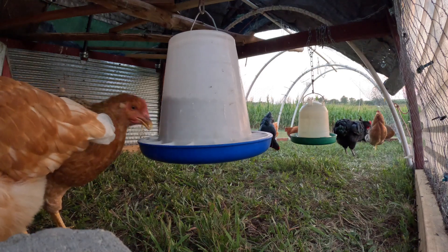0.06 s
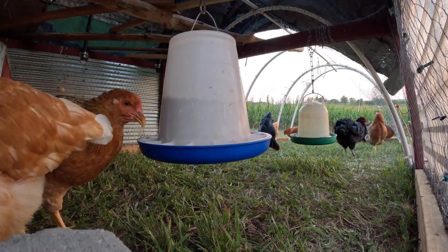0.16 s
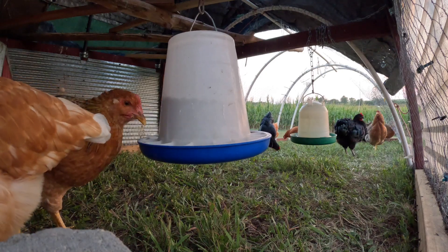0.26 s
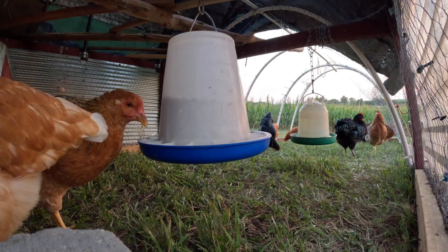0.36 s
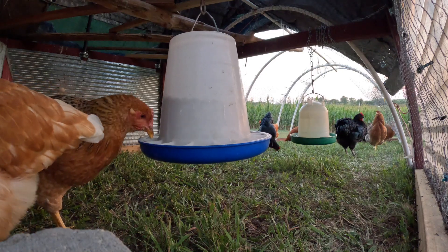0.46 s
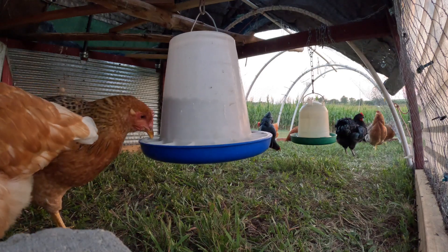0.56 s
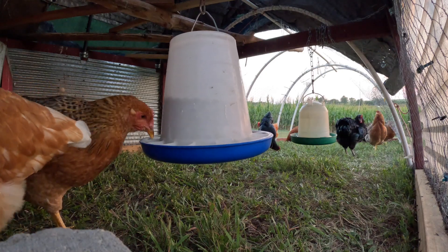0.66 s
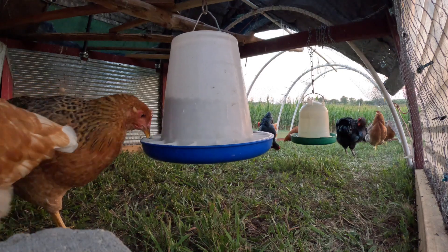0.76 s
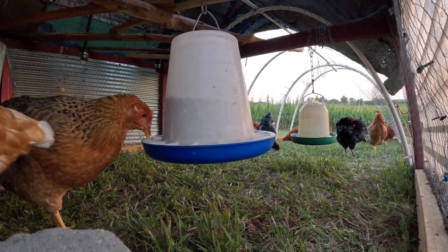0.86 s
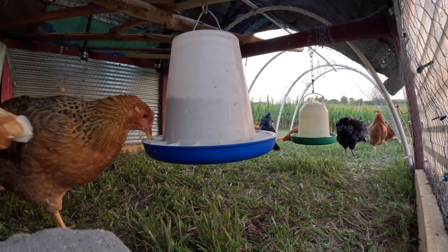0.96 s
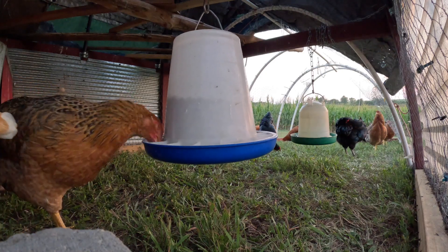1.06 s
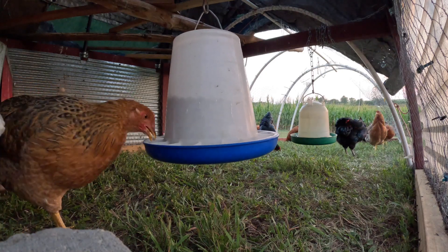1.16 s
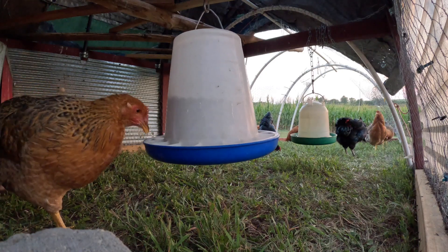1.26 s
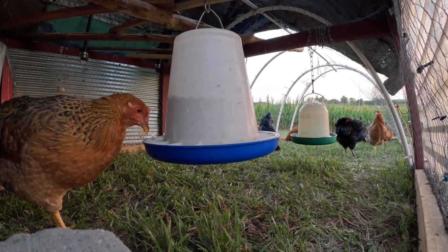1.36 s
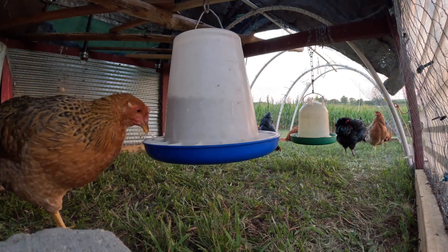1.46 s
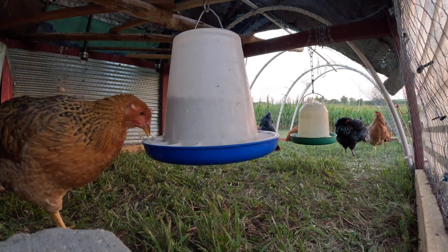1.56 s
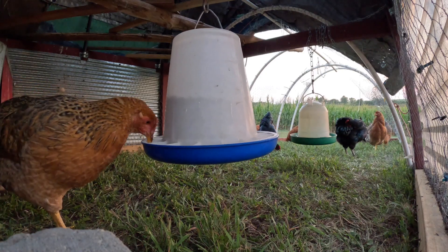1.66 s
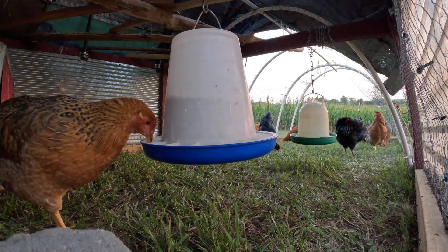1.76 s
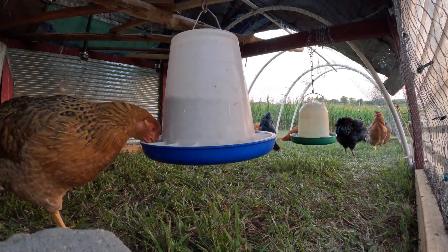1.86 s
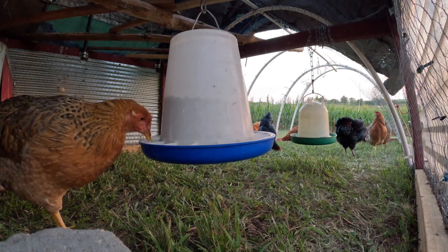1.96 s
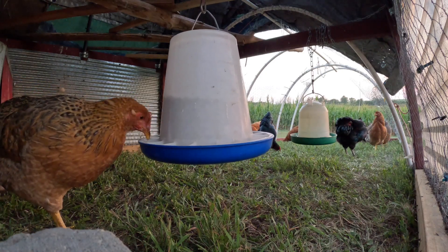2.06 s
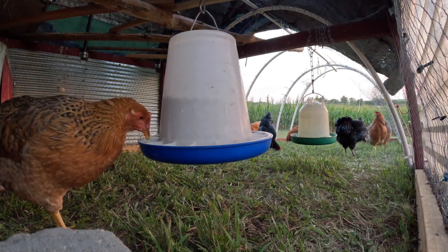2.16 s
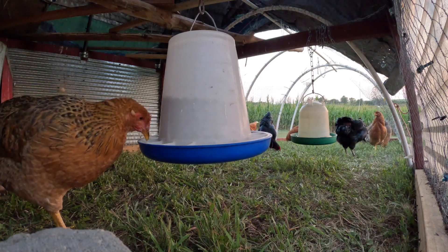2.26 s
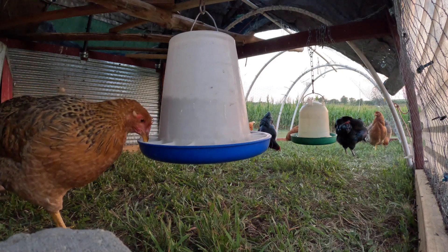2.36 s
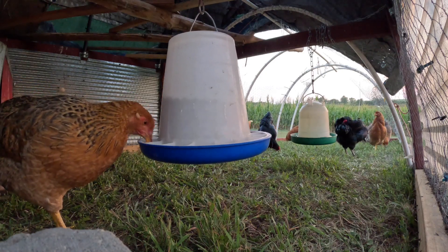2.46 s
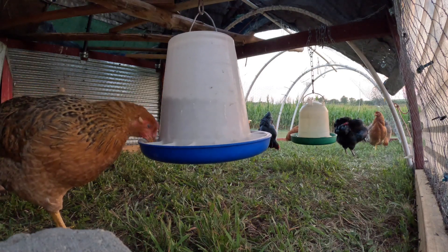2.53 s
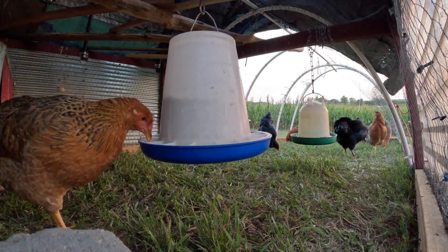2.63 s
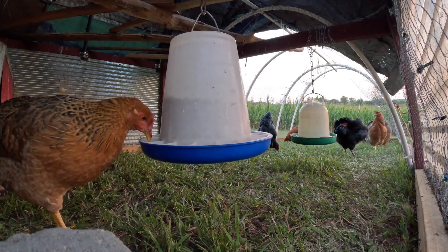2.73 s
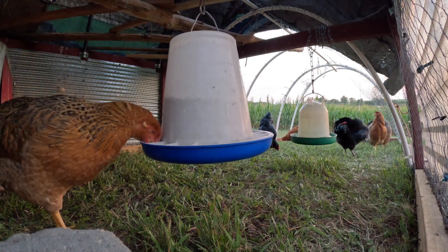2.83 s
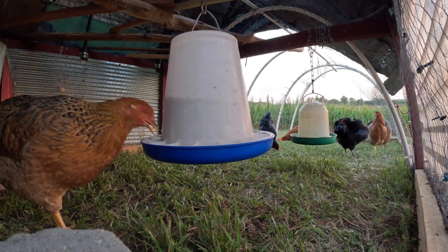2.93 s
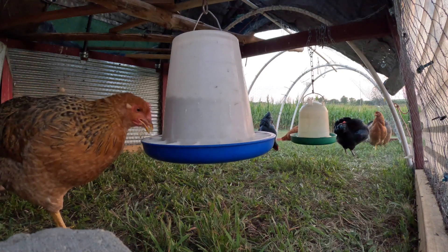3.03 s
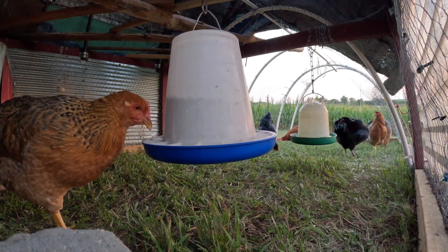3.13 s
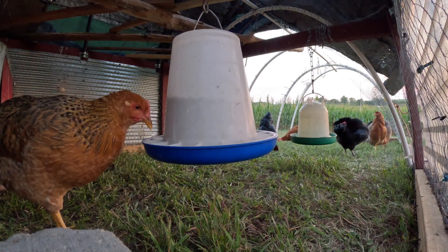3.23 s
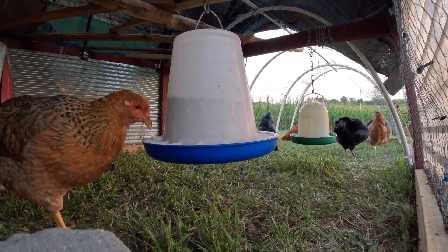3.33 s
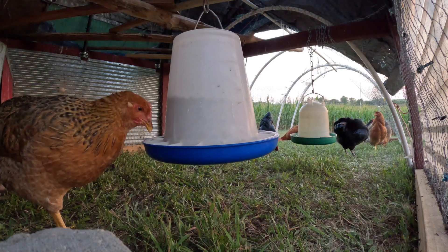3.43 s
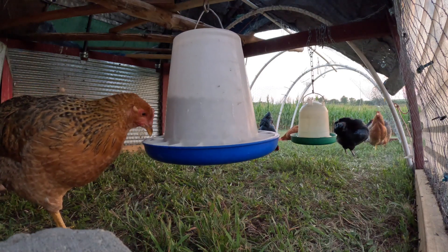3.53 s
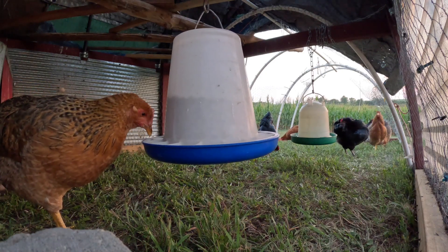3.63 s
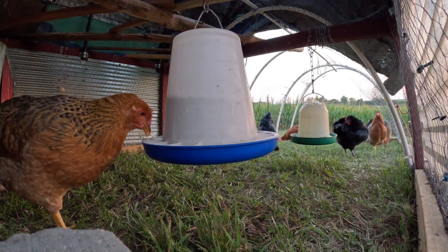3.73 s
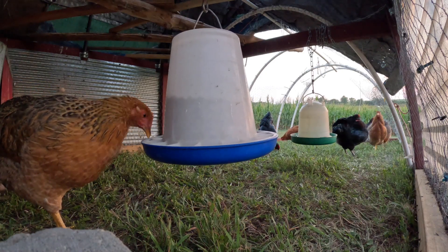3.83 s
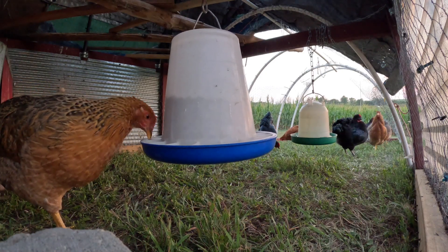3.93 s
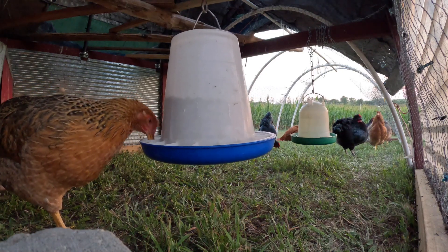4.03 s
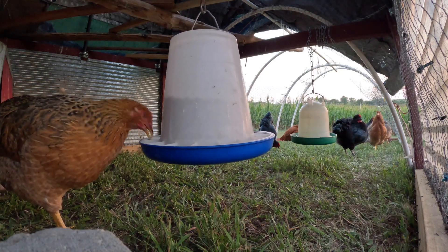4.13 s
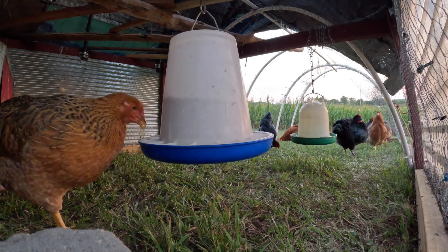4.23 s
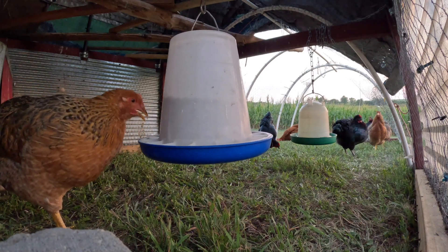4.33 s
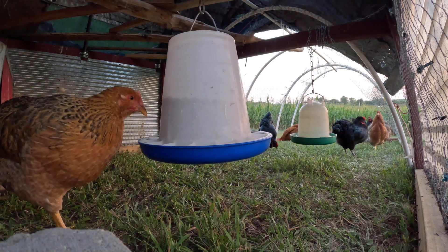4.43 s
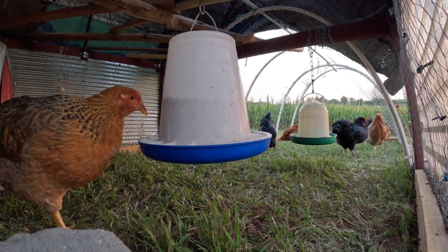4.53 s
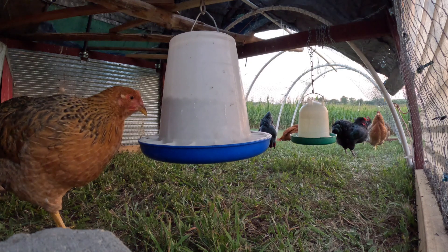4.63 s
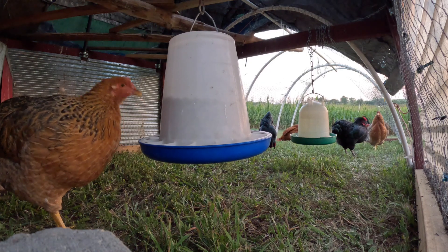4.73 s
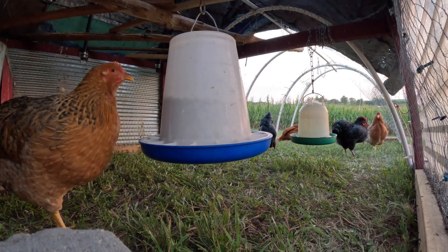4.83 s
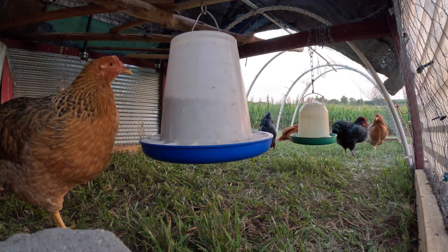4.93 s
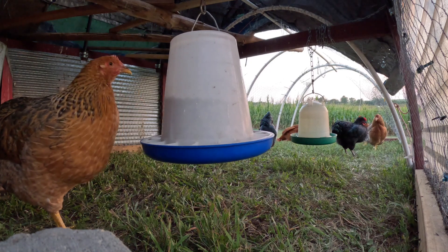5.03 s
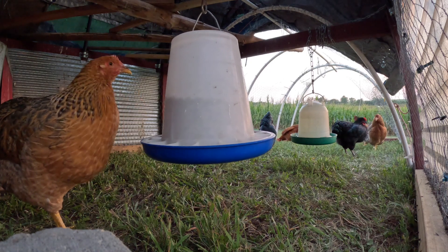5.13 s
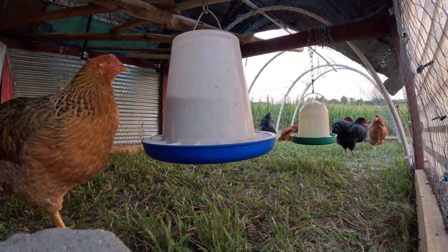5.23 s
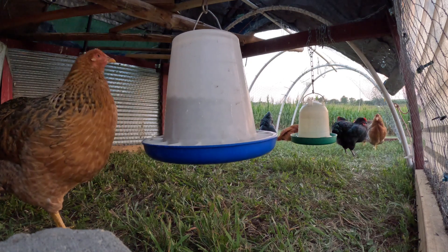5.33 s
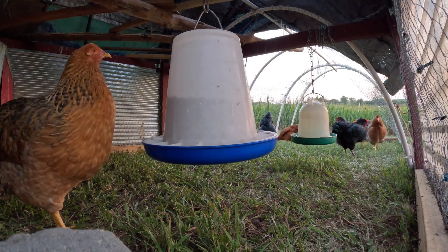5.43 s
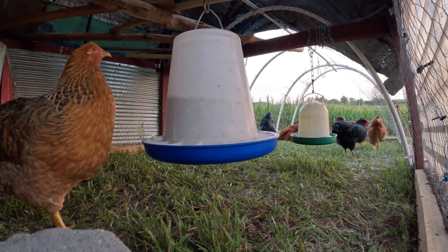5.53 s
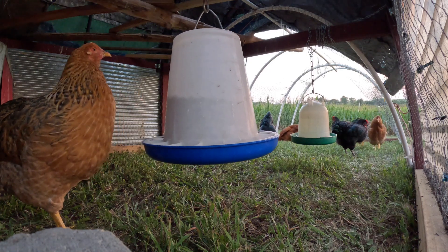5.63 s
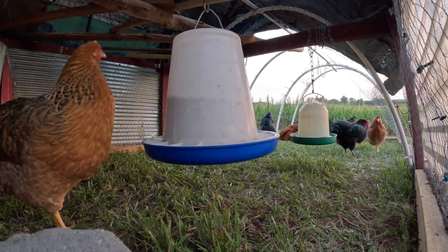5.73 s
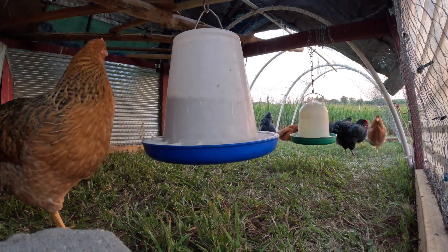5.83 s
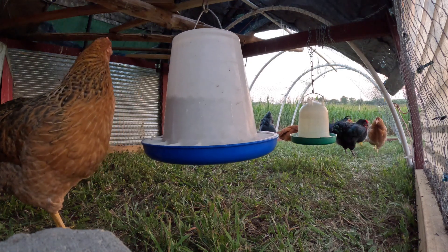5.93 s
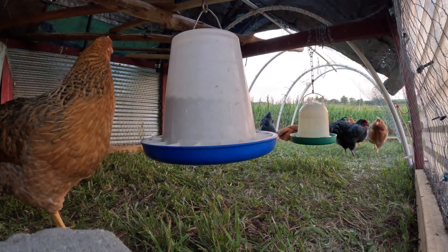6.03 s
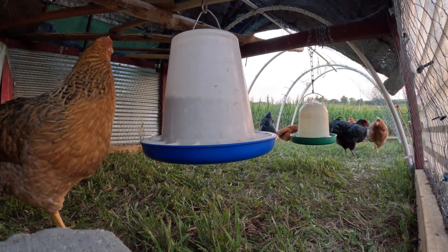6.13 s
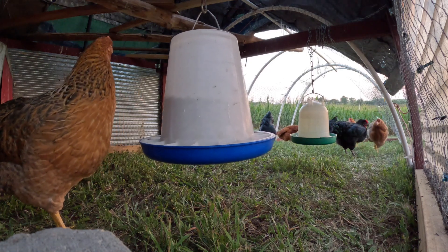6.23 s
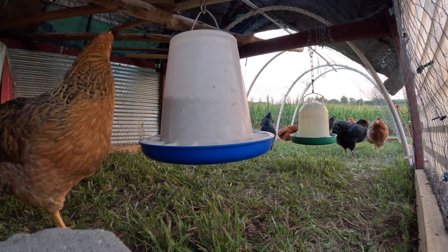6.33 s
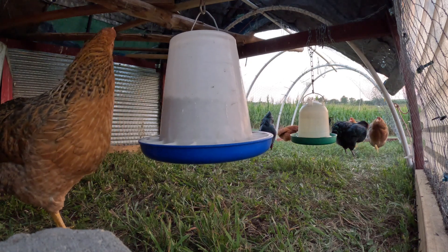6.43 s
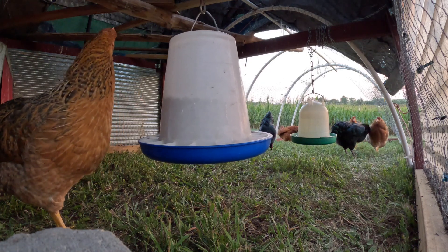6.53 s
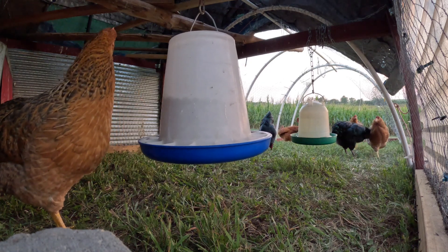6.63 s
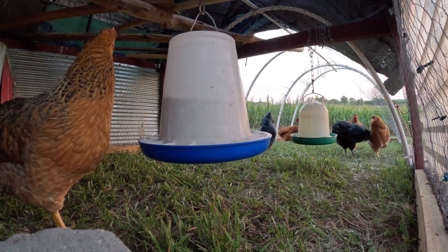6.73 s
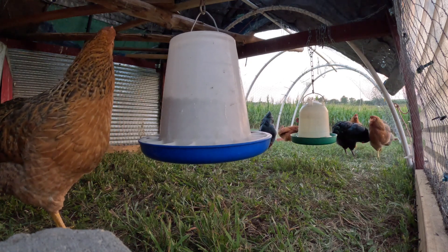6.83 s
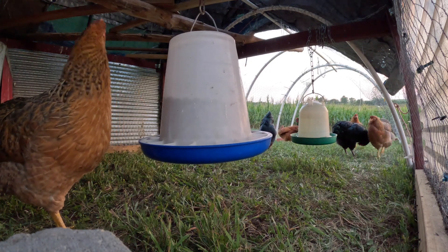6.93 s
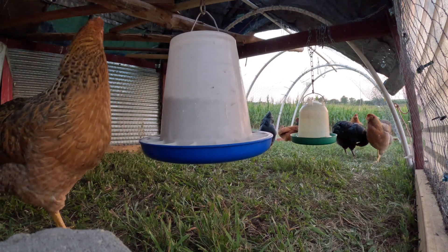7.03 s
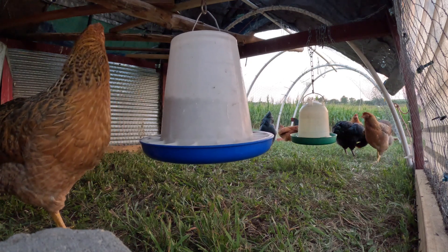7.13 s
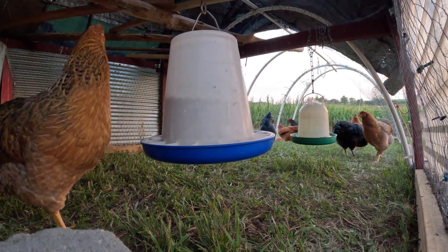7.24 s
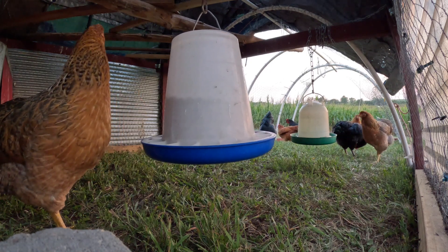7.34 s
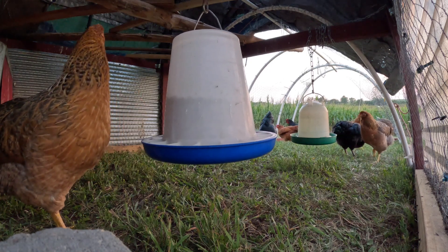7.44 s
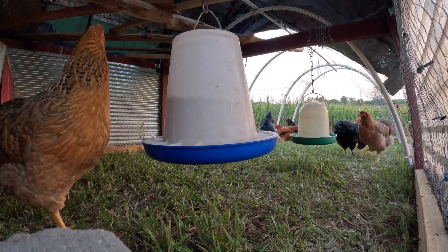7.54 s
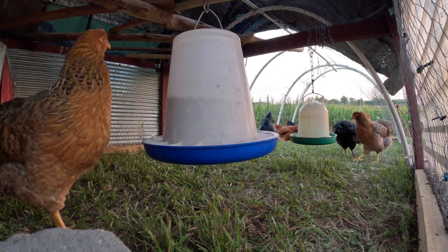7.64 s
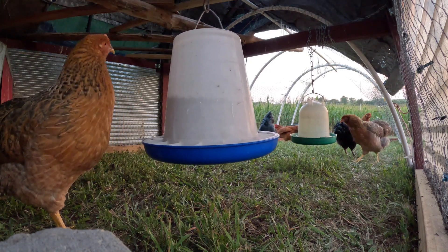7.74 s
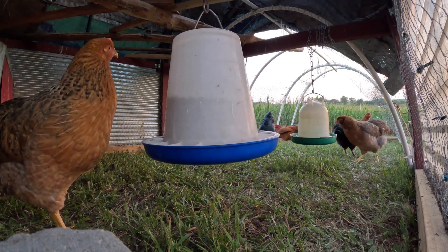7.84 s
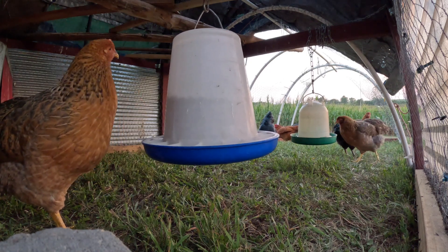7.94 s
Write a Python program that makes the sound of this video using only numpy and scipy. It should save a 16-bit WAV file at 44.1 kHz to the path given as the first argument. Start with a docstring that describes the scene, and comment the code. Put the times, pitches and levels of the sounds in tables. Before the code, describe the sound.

Faint insects chirr steadily around an outdoor chicken shelter, over light air and a distant rumble. Near the microphone, slightly left, a beak strikes a plastic feed tray in irregular bursts, some sharp and loud, most light, shifting the grain. After a lull with slight feather rustling, chickens a little further off cluck softly and end with short gliding squeaks.

```python
"""Hen at a hanging feeder

A hen pecks grain from a hanging plastic feeder under a low tin-roofed shelter. Her beak cracks
against the tray, rings it and stirs the feed; later, feathers rustle and the flock gives soft
clucks and squeaks, shaped by throat and beak. Crickets and katydids rasp their wings in the
field all round, over light air and a faint distant rumble."""
import sys
import numpy as np
from scipy import signal
from scipy.fft import rfft, irfft, next_fast_len
from scipy.io import wavfile

SR = 44100
rng = np.random.default_rng(int(sys.argv[2]) if len(sys.argv) > 2 else 0)


def wav_record(signal):
    """Record a signal, one row per channel, as 16-bit PCM in the file named by sys.argv[1]."""
    frames = np.transpose(np.atleast_2d(signal))
    bounded = np.clip(frames, -1, 1)
    # unit amplitude maps onto the largest positive 16-bit level
    quanta = np.round(bounded * 32767).astype(np.int16)
    wavfile.write(sys.argv[1], SR, quanta)


N = 352359
TIME = np.arange(N) / SR


def amp(db):
    """Decibels to gain."""
    return 10 ** (np.asarray(db) / 20)


def unit(x):
    """Scales to rms 1."""
    return x / np.sqrt(np.mean(x ** 2) + 1e-20)


def peaked(x):
    """Scales to peak 1."""
    return x / abs(x).max()


def read(points, hz):
    """Reads a curve on a log-frequency axis."""
    f, value = np.transpose(points)
    return np.interp(np.log(hz + 1), np.log(f), value)


def follow(rows, t):
    """Each column of an automation curve at the times t."""
    times, *columns = np.transpose(rows)
    return [np.interp(t, times, column) for column in columns]


def add(mix, start, sound):
    """Mixes a sound in at a start time in seconds."""
    part = mix[max(round(start * SR), 0):][:len(sound)]
    part += sound[:len(part)]


def colour(x, eq):
    """Runs a full-length signal through an EQ curve."""
    size = next_fast_len(N, real=True)
    return irfft(rfft(x, size) * amp(read(eq, np.fft.rfftfreq(size, 1 / SR))), size)[..., :N]


def pulse(eq, size=2048):
    """The minimum-phase click with a given spectrum."""
    log_gain = np.log(amp(read(eq, abs(np.fft.fftfreq(size, 1 / SR)))))
    return np.fft.ifft(np.exp(np.conj(signal.hilbert(log_gain)))).real


def drift(n, per_s):
    """A random modulator that glides to a new value per_s times a second."""
    knots = rng.standard_normal(4096)
    return np.interp(np.arange(n) / SR * per_s, np.arange(len(knots)), knots)


def ring(modes, t, tuning=1, tilt_db=0):
    """Struck modes, neighbours swinging opposite ways; tilt_db per octave favours the high ones."""
    out = np.zeros(len(t))
    for k, (hz, db, t60) in enumerate(modes):
        envelope = amp(db + tilt_db * np.log2(hz / modes[0][0]) - 60 * t / t60)
        out += (-1) ** k * envelope * np.sin(2 * np.pi * hz * tuning * t)
    return out


def spread(mid, side, width, pan_db):
    """Mid and side to stereo; positive pan_db leans left."""
    return np.array([(mid + width * side) * amp(pan_db / 2), (mid - width * side) * amp(-pan_db / 2)])


def crackle(showers, eq, per_s, spread_db):
    """Short showers of tiny clicks of uneven size."""
    out, click, n = np.zeros(N), pulse(eq), SR // 4
    for start, length, db in showers:
        hits = rng.random(n) < per_s / SR
        sizes = amp(spread_db * np.minimum(rng.exponential(1, n), 3))
        ticks = (hits * sizes * rng.choice([-1, 1], n))[:int(length * SR)]
        shower = unit(ticks * signal.windows.tukey(len(ticks), .3))
        add(out, start, amp(db) * signal.fftconvolve(shower, click / np.linalg.norm(click)))
    return out


# Side-channel EQ, setting how diffuse the beds are: (frequency [Hz], gain [dB])
BED_SIDE_EQ = [(60, -12.5), (130, -6), (290, -3), (640, -0.5), (1410, -2), (3100, 0), (6820, -11),
               (15000, -6)]

def bed(eq, db, flutter_db, flutter_per_s, pan_db):
    """A distant, partly diffuse noise bed with a fluttering level."""
    mid, side = unit(colour(rng.standard_normal((2, N)), eq))
    stereo = spread(mid, colour(side, BED_SIDE_EQ), 0.92, pan_db)
    return stereo * amp(db + flutter_db * drift(N, flutter_per_s))


# Tone of the open air: (frequency [Hz], gain [dB])
AIR_EQ = [(20, -9), (45, -8), (105, -11), (200, -14.5), (400, -14), (800, -22), (1200, -23), (2400, -28),
          (4500, -24), (7600, -20), (8300, -22), (10500, -41), (12500, -45), (15000, -51.5)]

def open_air():
    """A broad, steady hush, with light air buffeting the microphone in the sub-bass."""
    hush = bed(AIR_EQ, db=-69.5, flutter_db=.6, flutter_per_s=2.9, pan_db=-2.5)
    gust_eq = [(15, -3), (42, 16), (80, -10.5), (130, -16), (300, -50.5)]
    return hush + bed(gust_eq, db=-74.5, flutter_db=4.2, flutter_per_s=9, pan_db=-2)


# Tone of the far rumble: (frequency [Hz], gain [dB])
RUMBLE_EQ = [(90, -12.5), (125, -3.5), (155, 6), (205, 7), (260, -1), (350, -8), (600, -58)]
# Its fader ride: (time [s], level [dB])
RUMBLE_RIDE = [(0.4, -72), (2.29, -68), (3.73, -69.5), (4.9, -64.5), (5.12, -66), (7.4, -66.5)]

def distant_rumble():
    """Low, fluttering noise that slowly builds."""
    return bed(RUMBLE_EQ, follow(RUMBLE_RIDE, TIME)[0], flutter_db=2.7, flutter_per_s=22, pan_db=-0.61)


# Tone of the far rushing: (frequency [Hz], gain [dB])
RUSH_EQ = [(300, 7.5), (600, 0.5), (850, -1.5), (1080, 9.5), (1400, 7), (1900, -2.5), (2600, -20),
           (4000, -27.5)]
# Its fader ride: (time [s], level [dB])
RUSH_RIDE = [(0.3, -75.5), (0.57, -82.5), (2.05, -74.5), (2.54, -79), (5.76, -72), (6.31, -66.5),
             (6.65, -73.5), (7.9, -74)]

def distant_rush():
    """A soft midrange rushing that swells and ebbs."""
    return bed(RUSH_EQ, follow(RUSH_RIDE, TIME)[0], flutter_db=1.5, flutter_per_s=19, pan_db=-0.92)


# Tone of the massed far insects: (frequency [Hz], gain [dB])
CHORUS_EQ = [(2500, -25.5), (3300, -13.5), (4000, -5.5), (4900, -3), (5700, -5), (6500, -15.5),
             (7500, -7.5), (8300, -26.5), (10000, -77)]

def insect_chorus(start_db=-65, fade_db_per_s=1.2):
    """Far insects blur into one shimmer that slowly dies down."""
    return bed(CHORUS_EQ, start_db - fade_db_per_s * TIME, flutter_db=.9, flutter_per_s=60, pan_db=0)


# Nearer crickets and katydids: (centre [Hz], bandwidth [Hz], stroke rate [1/s], unevenness [dB],
# opening level [dB], closing level [dB])
INSECT_VOICES = [(4737, 300, 23, 3, -73.5, -75.5), (5100, 110, 18, 3.5, -74.5, -78),
                 (7480, 380, 16, 0.6, -76.5, -74), (7860, 300, 14, 1.4, -79, -78),
                 (3635, 290, 37, 2, -82.5, -88.5)]

def near_insects(stroke_depth=.45, rate_wander=.3):
    """Each rasps a narrow band in quick wing strokes that come in uneven spurts."""
    out, size = np.zeros((2, N)), next_fast_len(N)
    f = np.fft.rfftfreq(size, 1 / SR)
    for hz, width, per_s, swell_db, first_db, last_db in INSECT_VOICES:
        band = 1 / (1 + (2 * (f - hz) / width) ** 4)
        rasp = unit(irfft(band * rfft(rng.standard_normal((2, size))), size)[:, :N])
        cycles = np.cumsum(per_s * (1 + rate_wander * drift(N, 6))) / SR
        spurts = amp(swell_db * drift(N, 8.2))
        strokes = unit((1 + stroke_depth * np.cos(2 * np.pi * cycles)) * spurts)
        fader = amp(first_db + (last_db - first_db) * TIME / TIME[-1])
        out += spread(*rasp, width=.25, pan_db=0.63) * strokes * fader
    return out


# Early reflections off ground, wall and roof: (delay [s], level before the echo_db trim [dB])
REFLECTIONS = [(.0017, -17), (.0088, -25.5), (0.0135, -18)]
# Decay of the scatter under the roof: (frequency [Hz], t60 [s])
SHELTER_DECAY = [(150, 0.053), (500, 0.07), (1600, 0.081), (4000, 0.054), (12000, 0.075)]

def shelter(x, wet_db, echo_db, pan_db, late_db=-27, late_t60=0.28, width=0.68):
    """The direct sound, a few near reflections, a short scatter and a faint longer tail."""
    t = TIME[:SR // 2]
    hz, age, noise = signal.stft(rng.standard_normal((2, len(t))), SR, nperseg=256)
    decay = amp(-60 * age / read(SHELTER_DECAY, hz)[:, None]) + amp(late_db - 60 * age / late_t60)
    fade_in = np.clip((t - .002) / 0.0045, 0, 1)
    tail = signal.istft(noise * decay, SR, nperseg=256)[1][:, :len(t)] * fade_in
    mid, side = amp(wet_db) * tail / np.linalg.norm(tail[0])
    mid[0] += 1  # direct sound
    for delay, db in REFLECTIONS:
        mid[round(delay * SR)] += amp(db + echo_db)
    return signal.fftconvolve(x[None], spread(mid, side, width, pan_db), axes=1)[:, :N]


# Feather and grass brushes: (time [s], length [s], level [dB])
RUSTLE_CUES = [(.82, .082, -72), (4.97, .028, -70.5), (5.665, 0.081, -63), (6.215, .027, -72),
               (6.65, 0.029, -65.5), (7.105, .019, -69)]
# Their papery tone: (frequency [Hz], gain [dB])
FEATHER_EQ = [(300, 4), (1500, 8), (2600, 5.5), (4500, 9.5), (8000, 13.5), (10500, 1), (15000, -17)]

def feather_rustles():
    """Feathers and grass brush in a fine, bright crackle."""
    return crackle(RUSTLE_CUES, FEATHER_EQ, per_s=2500, spread_db=2)


# Low clucks: (time [s], length [s], starting pitch [Hz], fall [octaves], level [dB],
# brightness [dB/octave], roughness [0-1])
CLUCK_CUES = [(6.505, 0.082, 332, 0.243, -56.5, -4, 0.54), (6.731, 0.077, 298.8, 0.027, -51.5, -4.5, 0.2),
              (6.891, 0.041, 345, 0.46, -51, -8, 0.3), (7.061, 0.055, 299, .12, -56.5, -17, 0.25),
              (7.531, 0.078, 193, .38, -42, 2, 0.24), (7.711, 0.042, 308, .15, -61.5, -10, 0.27)]
# Single pops of the voice: (time [s], peak level [dB])
POP_CUES = [(6.955, -37), (7.2065, -38), (7.422, -36.5)]
# Formants of the throat: (frequency [Hz], gain [dB])
THROAT_EQ = [(70, -43), (165, 14), (300, 4), (460, -4.5), (680, -1), (850, -4), (1150, 0), (1450, -7),
             (2200, -17.5), (2650, -40), (3500, -29), (4500, -60), (9000, -71)]

def clucks(jitter=0.1, attack_s=0.012, release_s=0.029, dulling_db_per_octave=1):
    """Uneven syrinx pulses, with a puff in each cycle, ring the throat; a lone pulse makes a pop."""
    out, throat = np.zeros(N), pulse(THROAT_EQ)
    for start, length, start_hz, fall, db, bright_db, rough in CLUCK_CUES:
        t = np.arange(0, length, 1 / SR)
        hz = start_hz * 2 ** (-fall * t / length)
        slope_db = bright_db - dulling_db_per_octave * (t / length - .5)  # dulls as breath runs out
        cycles = np.cumsum(hz * (1 + jitter * rough * drift(len(t), 245))) / SR
        buzz = sum(amp(slope_db * np.log2(k)) * np.cos(2 * np.pi * k * cycles) for k in range(1, 30))
        puffs = np.exp(-(cycles % 1) / 1.6) * rng.standard_normal(SR)[:len(t)]
        tone, rasp = (unit(signal.fftconvolve(drive, throat)[:len(t)]) for drive in (buzz, puffs))
        envelope = np.minimum(t / attack_s, 1) * np.minimum((length - t) / release_s, 1)
        add(out, start, amp(db) * envelope * unit((1 - rough) * tone + rough * rasp))
    open_beak_hz = 1100  # the resonance the pops centre on
    pop = peaked(pulse([(hz, db - 5 * abs(np.log2(hz / open_beak_hz))) for hz, db in THROAT_EQ]))
    for start, db in POP_CUES:
        add(out, start, amp(db) * pop)
    return out


# Two squeaks, one automation curve each: (time [s], pitch [Hz], level [dB])
SQUEAK_CURVES = [
    [(7.237, 1580, -50), (7.247, 1610, -52.5), (7.255, 1236, -40.5), (7.273, 934, -48), (7.285, 880, -61)],
    [(7.86, 713, -68), (7.87, 642, -46), (7.888, 655, -67), (7.896, 691, -49), (7.906, 565, -37),
     (7.922, 498, -36), (7.934, 666, -43), (7.944, 672, -46), (7.952, 1040, -39), (7.964, 1216, -37),
     (7.98, 1034, -40.5), (7.989, 1080, -42)],
]
# Resonance of the half-open beak: (frequency [Hz], gain [dB])
BEAK_EQ = [(400, -13), (600, -8), (800, 13), (1100, 2), (1300, -6), (1650, -13.5), (2300, -31), (3200, -36),
           (6000, -64)]

def squeaks(slope_db=-3, jitter=.005):
    """Clear gliding notes; the half-open beak picks out the partial nearest its resonance."""
    out, harmonics = np.zeros(N), np.arange(1, 6)[:, None]
    for curve in SQUEAK_CURVES:
        t = np.arange(curve[0][0], curve[-1][0], 1 / SR)
        hz, db = follow(curve, t)
        phase = 2 * np.pi * np.cumsum(hz * (1 + jitter * drift(len(t), 290))) / SR
        gains = amp(read(BEAK_EQ, harmonics * hz) + slope_db * np.log2(harmonics))
        note = np.sqrt(2) * (gains * np.sin(harmonics * phase)).sum(0) / np.linalg.norm(gains, axis=0)
        add(out, t[0], amp(db) * note * signal.windows.tukey(len(t), .08))
    return out


# Pings of the wire hanger: (time [s], pitch [Hz], level [dB], t60 [s])
HANGER_CUES = [(1.441, 4080, -66, 1.8), (4.254, 4110, -64, 0.6)]

def hanger_pings(rise_s=.025):
    """The wire takes a moment to pick up a knock, then rings on one thin note."""
    out, t = np.zeros(N), TIME[:SR]
    for start, hz, db, t60 in HANGER_CUES:
        add(out, start, ring([(hz, db, t60)], t) * (1 - np.exp(-t / rise_s)))
    return out


# Modes of the hollow bin above the tray: (frequency [Hz], level [dB], t60 [s])
BIN_MODES = [(166, 1, 0.076), (235, -1, 0.074), (345, 15.5, 0.023), (640, 1.5, 0.03505)]
# Knocks that shake the whole bin: (time [s], peak level [dB])
THUMP_CUES = [(.0188, -35.5), (.0775, -44.5), (0.1111, -31.5), (1.153, -52)]

def bin_thumps(rise_s=.002):
    """The hollow bin booms briefly, adding weight under a few of the pecks."""
    out, t = np.zeros(N), TIME[:SR // 6]
    thump = peaked(ring(BIN_MODES, t) * (1 - np.exp(-t / rise_s)))
    for start, db in THUMP_CUES:
        add(out, start, amp(db) * thump)
    return out


# Sweeps of the beak through the feed: (time [s], length [s], level [dB])
STIR_CUES = [(.009, 0.026, -50), (.222, 0.025, -61.5), (1.143, 0.018, -50), (1.252, 0.018, -56),
             (1.934, 0.037, -51.5), (2.586, 0.041, -46.5), (2.911, 0.0183, -45), (2.956, 0.019, -58.5),
             (4.153, 0.017, -50.5), (4.195, 0.0045, -56.5)]
# Tone of one grain's click: (frequency [Hz], gain [dB])
GRAIN_EQ = [(100, -39.5), (400, -22.5), (700, -5), (900, -16.5), (1200, -2.5), (1800, 1.5), (2600, -6.5),
            (3600, -4.5), (5000, -9.5), (7000, -8.5), (10000, -22), (15000, -44)]

def grain_stirs():
    """The beak ploughs through the grain in short, gritty showers."""
    return crackle(STIR_CUES, GRAIN_EQ, per_s=1200, spread_db=3.5)


# Beak hits on the tray: (time [s], level [dB], hardness [dB/octave], tray tuning [ratio])
PECK_CUES = [(0.0187, -24.5, -2, 1.01), (.0775, -12.5, 4, .85), (0.1097, -9, 3.5, .98),
             (0.1099, -20.5, 1.5, 1.22), (1.151, -28, 1, 0.76), (1.1645, -33.5, -2, 1.05),
             (1.2479, -35.5, -9, 1.04), (1.2596, -38.5, -12, 1.05), (1.441, -48, 8, 1.1),
             (1.9348, -39.5, 1, 0.93), (1.9525, -34, -5, .83), (1.967, -36, -3, 1.08),
             (2.271, -59, 0, 0.87), (2.5871, -30, 4, 0.98), (2.5975, -36, -9, 1.18),
             (2.6208, -33.5, 4, 0.85), (2.9094, -36.5, -1.5, 1.07), (2.9857, -11, 3, 1.2),
             (3.033, -30, 3.5, 1.4), (3.037, -23.5, 4.5, 1.06), (3.0616, -32.5, -3, 1.02),
             (3.0705, -33.5, -4, 0.98), (3.0726, -27, 11, .85), (3.085, -34.5, 1, 0.936),
             (3.095, -43, -10, 0.94), (4.149, -41, -2, 0.99), (4.1544, -36, 4, 0.94),
             (4.2518, -36, -2.5, 0.91), (4.2568, -37, 0.5, 0.93), (4.3519, -45.5, -9, 0.99),
             (5.438, -51, -4, .8)]
# Modes of the plastic tray: (frequency [Hz], level [dB], t60 [s])
TRAY_MODES = [(1126, -9, .009), (1350, -0.5, 0.012), (1567, 4.5, 0.009), (1825, 1.5, .012),
              (2165, -6.5, 0.013), (2850, -13.5, 0.0047), (3945, -7, 0.0099), (4950, -7, .004)]
# The beak's own dry crack: (frequency [Hz], gain [dB])
CRACK_EQ = [(200, -39), (550, -25), (800, -13), (1100, -11.5), (1800, -1.5), (2700, -2.5), (3700, 4.5),
            (5200, -4), (7200, -6.5), (9500, -16.5), (12000, -33), (15500, -40)]

def pecks(detune=.03, spot_db=1.2, crack_per_hardness=2, chatter_db=-12, chatter_s=0.0013):
    """Each hit cracks, rings the tray and jolts the grain in it; harder hits are brighter."""
    out, t = np.zeros(N), TIME[:SR // 6]
    crack = peaked(pulse(CRACK_EQ, size=len(t)))
    # A small tray gives off little bass, and the beak's contact time rounds off the top.
    tray_band = signal.butter(3, [1050, 6060], "bandpass", fs=SR, output="sos")
    for start, db, hardness, tuning in PECK_CUES:
        spot = rng.standard_normal((len(TRAY_MODES), 2))  # each spot on the rim rings differently
        modes = [(hz * (1 + detune * pitch_shift), level + spot_db * level_shift, t60)
                 for (hz, level, t60), (pitch_shift, level_shift) in zip(TRAY_MODES, spot)]
        tap = peaked(signal.sosfilt(tray_band, ring(modes, t, tuning, hardness)))
        knock = peaked(tap + amp(crack_per_hardness * hardness) * crack)
        chatter = rng.standard_normal(len(t)) * np.exp(-t / chatter_s)
        contact = amp(chatter_db) * chatter / np.linalg.norm(chatter)
        contact[0] += 1  # the blow itself, ahead of the chattering grains
        peck = signal.fftconvolve(knock, contact / np.linalg.norm(contact))[:len(t)]
        add(out, start, amp(db) * peck)
    return out


def scene():
    """The feeder is close and a little left; the voices lie further in, the field all round."""
    foley = pecks() + bin_thumps() + hanger_pings() + grain_stirs() + feather_rustles()
    near = shelter(foley, wet_db=-9, echo_db=-6.5, pan_db=2)
    low_voices = shelter(clucks(), wet_db=-5, echo_db=-18, pan_db=0.5)
    high_voices = shelter(squeaks(), wet_db=-8.5, echo_db=-16, pan_db=2)
    field = open_air() + distant_rumble() + distant_rush() + insect_chorus() + near_insects()
    return field + low_voices + high_voices + near


def record(dry, lag_s=1.25e-5, hiss_db=-82, cutoff_hz=15400):
    """The left microphone hears a trifle later and adds a thin hiss; both sides get a steep high cut."""
    hiss_eq = [(4000, -28), (9000, -6), (12500, 3.5), (15000, -2.5), (17000, -6)]
    hiss = amp(hiss_db) * unit(colour(rng.standard_normal(N), hiss_eq))
    delay = np.exp(-2j * np.pi * np.fft.rfftfreq(N, 1 / SR) * lag_s)
    left = irfft(rfft(dry[0]) * delay, N) + hiss
    high_cut = signal.firwin(511, cutoff_hz, window=("kaiser", 9), fs=SR)
    return signal.oaconvolve(np.array([left, dry[1]]), high_cut[None], "same")


dry = scene()
out = record(dry)
wav_record(out)
```